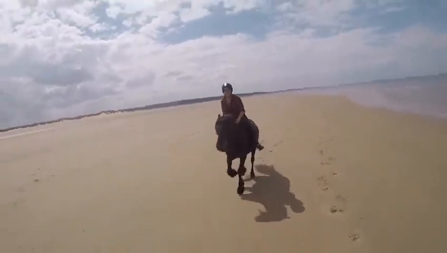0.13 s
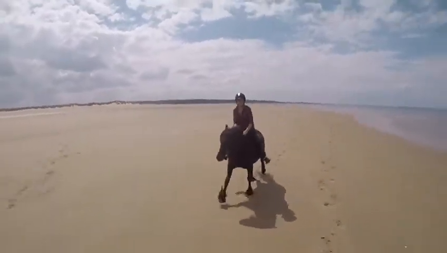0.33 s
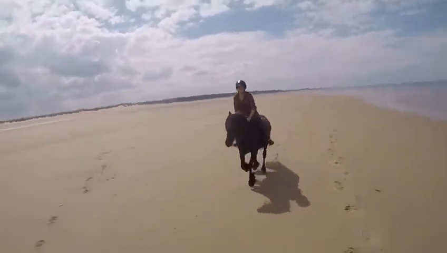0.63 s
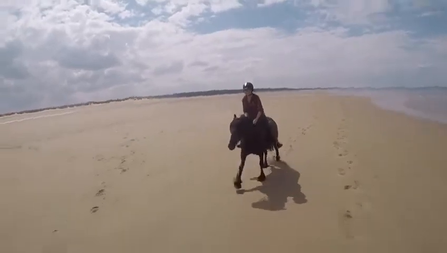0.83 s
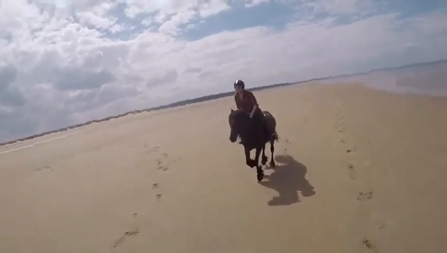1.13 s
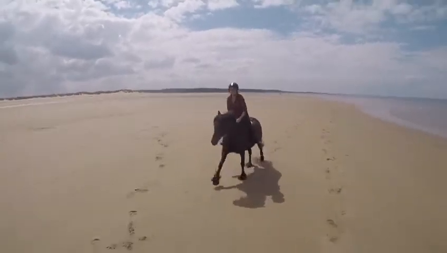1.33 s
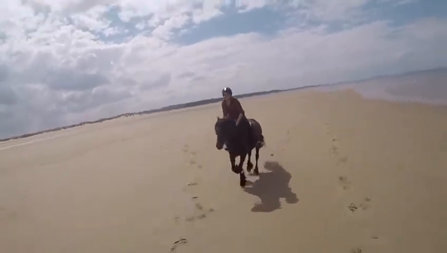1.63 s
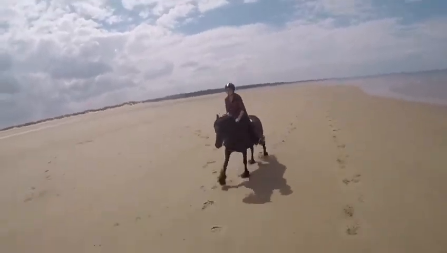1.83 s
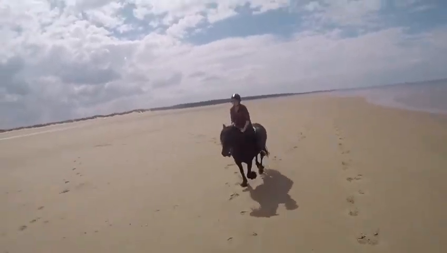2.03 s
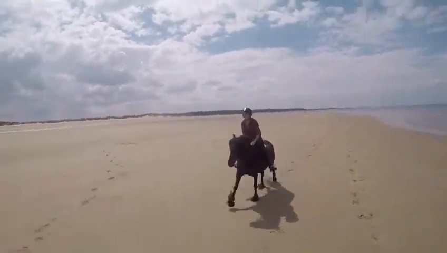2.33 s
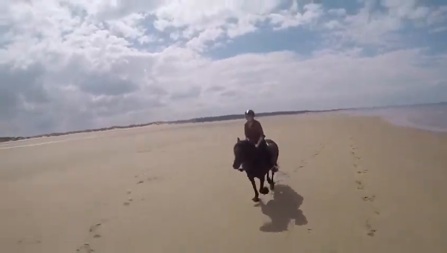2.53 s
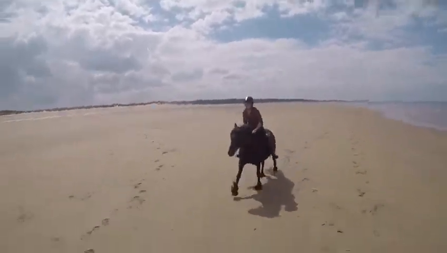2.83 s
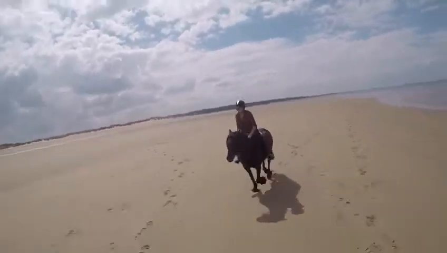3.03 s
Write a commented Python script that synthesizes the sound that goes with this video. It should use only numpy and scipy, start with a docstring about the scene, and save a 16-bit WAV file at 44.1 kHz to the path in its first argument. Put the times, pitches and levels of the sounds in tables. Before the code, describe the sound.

A horse's hooves canter on firm damp sand close to a moving microphone, dull hollow slaps in quick uneven clusters, about two strides a second, with constant low wind buffeting and faint sand grit, outdoors without echo.

```python
"""Open beach, firm damp sand: a horse canters close behind a moving microphone, about two strides a second.
From the first moment wind noise buffets the microphone, with rounded thumps, rough rushes and hiss over steady air;
sand swishes and crumbs patter, as shaped noise and small resonances; tack and some hoof contacts tick as short rings.
From 0.18 s to 3.0 s the hooves land, often heel then toe: a filtered click slaps, rebounds and rings hollow,
with decaying noise for grit and knock and a decaying sine for the thud; wind and a faint last tick close the scene."""
import sys
import numpy as np
from scipy import signal
from scipy.fft import rfft, irfft
from scipy.io import wavfile
from scipy.ndimage import uniform_filter1d

SR = 44100
rng = np.random.default_rng(int(sys.argv[2]) if len(sys.argv) > 2 else 0)


def file_out(sig):
    """Save sig as 16-bit WAV at sys.argv[1]."""
    # one column per channel
    cols = np.atleast_2d(sig).T
    # limit, then scale
    lim = np.clip(cols, -1, 1)
    pcm = np.round(lim * 32767).astype(np.int16)
    wavfile.write(sys.argv[1], SR, pcm)


N = 140238
T = np.arange(N) / SR

# Wind at the microphone. The level curves are before the trims below.
# low buffeting over time [t/s, level/dB]
BUFFET_LEVEL = [(0.0, -23.5), (0.21, -19), (0.26, -19), (0.33, -20), (0.5, -22), (0.56, -22.5),
                (0.61, -26.5), (0.79, -17), (0.82, -25.5), (1.0, -21), (1.15, -22.5), (1.2, -27),
                (1.24, -19.5), (1.39, -22), (1.44, -16.5), (1.52, -25.5), (1.65, -29), (1.73, -25),
                (1.78, -16.5), (1.87, -30), (1.95, -16), (1.99, -26.5), (2.05, -24), (2.13, -28.5),
                (2.23, -18.5), (2.31, -16), (2.43, -19), (2.46, -27), (2.52, -21), (2.63, -22.5),
                (2.70, -20), (2.76, -24), (2.79, -22), (2.83, -21.5), (2.88, -22), (3.18, -23.5)]
# rough rush of the gusts over time [t/s, level/dB]
RUSH_LEVEL = [(0.0, -29.5), (0.13, -29.5), (0.18, -28), (0.53, -28.5), (0.57, -22), (0.59, -33.5),
              (0.88, -27), (0.91, -39), (1.0, -21), (1.11, -31), (1.14, -23), (1.19, -37.5), (1.43, -26.5),
              (1.64, -39), (1.69, -28.5), (1.83, -33.5), (1.96, -25), (1.97, -39.5), (2.17, -42),
              (2.18, -28), (2.35, -28), (2.39, -23), (2.58, -27), (2.59, -22), (2.66, -47), (2.68, -29.5),
              (2.81, -43.5), (2.87, -31), (3.16, -41.5), (3.18, -30)]
# grainy hiss over time [t/s, level/dB]
HISS_LEVEL = [(0.0, -41), (0.12, -44), (0.36, -33.5), (0.53, -35.5), (0.71, -44), (1.18, -37.5),
              (1.41, -38.5), (1.63, -43), (1.89, -40), (2.02, -40.5), (2.24, -43), (2.4, -47),
              (2.53, -40.5), (2.67, -40), (3.18, -40)]
# grainy treble over time, followed by the crumbs too [t/s, level/dB]
TREBLE_LEVEL = [(0.0, -53), (0.14, -46), (0.27, -47.5), (0.36, -40), (0.58, -43.5), (0.68, -48),
                (1.36, -48), (1.59, -51.5), (1.86, -49.5), (2.03, -58), (2.26, -51.5), (2.42, -44.5),
                (2.47, -44.5), (2.62, -51), (2.85, -50), (2.98, -54), (3.18, -51)]
# spectrum of the buffeting [f/Hz, relative level/dB]
BUFFET_COLOUR = [(10, -3.5), (25, -1), (45, 2), (65, -0.5), (120, -4), (170, -12), (250, -20), (450, -37),
                 (1000, -75.5)]
# spectrum of the rush [f/Hz, relative level/dB]
RUSH_COLOUR = [(80, -28), (200, 0.5), (320, -1), (480, -4), (800, -9.5), (1300, -18), (2200, -26),
               (5000, -59.5)]
# spectrum of the hiss [f/Hz, relative level/dB]
HISS_COLOUR = [(300, -0.5), (800, 6.5), (1200, 5.5), (1700, 1.5), (2200, 5), (2700, -13.5), (3400, -5),
               (4200, -23.5), (7000, -41)]
# spectrum of the treble and of the snap of a tick [f/Hz, relative level/dB]
TREBLE_COLOUR = [(2000, -20), (3200, 2.5), (4000, 0.5), (5000, -6), (6500, -8), (7800, -39), (10000, -38)]
# spectrum of the steady sea air [f/Hz, relative level/dB]
AIR_COLOUR = [(500, -4.5), (3000, -28), (5000, -19.5), (7500, 4), (10000, -1)]
BUFFET_TRIM_DB, RUSH_TRIM_DB, HISS_TRIM_DB, TREBLE_TRIM_DB = 3, 0.5, -1.5, -1
AIR_DB = -61
# dB per unit of flutter; the hiss depth serves the treble too
BUFFET_FLUTTER_DB, RUSH_FLUTTER_DB, HISS_FLUTTER_DB = 0.5, 3.5, 3
FLUTTER_HZ = 49.6

# eddies that thump the microphone [t/s, level/dB before the trim, f/Hz]
EDDY_THUMPS = [(.05, -13, 104), (0.142, -9, 100), (.18, -12, 160), (0.234, -6.5, 100), (0.28, -5, 89),
               (.328, -8, 191), (.403, -5.5, 190), (.452, -7.5, 141), (0.527, -4, 136), (.556, -4, 172),
               (.572, -7, 113.6), (0.778, -10, 94), (1.018, -7.5, 161), (1.047, -15, 580),
               (1.06, -10.5, 147), (1.128, -7.5, 147), (1.292, -7.5, 139), (1.324, -8.5, 210),
               (1.453, -10, 168), (1.534, -10, 139), (1.711, -6.5, 125), (1.768, -9.5, 175),
               (1.838, -8.5, 109), (1.901, -8, 99), (1.93, -10.5, 151), (1.945, -13, 340),
               (2.284, -9, 74.3), (2.378, -9.5, 310), (2.421, -6, 130), (2.473, -10, 360),
               (2.484, -7.5, 97), (2.527, -5, 145), (2.589, -13, 231)]
THUMP_CREST_CYCLES, THUMP_TRIM_DB = 0.6, -2.5  # swings until the crest of the swell
THUMP_ROUNDNESS, THUMP_SKEW = 1.84, 0.24  # exponent of the swell; share of second harmonic

# Crumbs of damp sand raining down behind the hooves
CRUMBS_PER_S, CRUMB_CYCLES, CRUMB_SPREAD_DB = 450, 36, 3.5
CRUMB_LOW_HZ, CRUMB_HIGH_HZ = 2057, 5200
CRUMB_TILT_DB = -4  # per octave, on top of the 1/sqrt(f) weight
CRUMB_TRIM_DB = -2  # against the treble curve

# swishes of kicked sand [t/s at the middle, length/s, level/dB, centre f/Hz]
SAND_SWISHES = [(0.067, 0.029, -39.5, 4500), (0.337, 0.085, -44, 2900), (0.573, 0.027, -44.5, 4650),
                (0.707, 0.022, -40, 2480), (1.061, 0.049, -40.5, 4200), (1.143, 0.029, -39, 4100),
                (1.459, 0.041, -38, 4080), (1.808, 0.056, -50, 4700), (1.945, 0.032, -41.5, 3950),
                (2.265, 0.029, -35.5, 3940), (2.336, 0.012, -40.5, 4500), (2.562, 0.095, -43, 4300),
                (2.848, 0.029, -35, 1890), (2.979, 0.037, -41, 4600)]
# spectrum of fine grains pushed aside by the hoof [f/Hz, relative level/dB]
SPRAY_COLOUR = [(1000, -23), (3000, 5), (4500, 3), (6500, -4.5), (8000, -11), (10000, -17)]
SPRAY_DB = -34  # against the hoof level
SPRAY_LAG_S, SPRAY_DECAY_S = 0.001, 0.0068
SWISH_WIDTH = 1.24  # band edges over the centre
CLUMP_HZ, CLUMP_DB = 130, 4  # kicked sand flies in clumps; dB per unit of flutter
GRAIN_SPREAD_DB = 4.5

# short bright ticks: tack, and the sharp clicks of some hoof contacts [t/s, level/dB before the trim, f/Hz]
BRIGHT_TICKS = [(0.1258, -11, 3650), (0.4472, -13.5, 3000), (0.7494, -15.5, 3900), (0.754, -26.5, 4500),
                (0.95, -21, 5900), (1.136, -27, 4600), (1.773, -18.5, 3200), (2.0102, -19.5, 2740),
                (2.1777, -18.5, 2770), (2.1911, -21, 2880), (3.143, -27.5, 4300)]
TICK_CYCLES = 4.3  # sets the width of the resonances
RATTLE_T60_S, RATTLE_DB = 0.013, -15.5
TICK_TRIM_DB, SNAP_DB = -4, -20  # the snap is the broad first edge, against the ring

# hoof contacts [t/s, level/dB, sharpness f/Hz, hollow ring level/dB against the slap]
HOOF_CONTACTS = [(0.1796, -9, 2500, -5), (0.1941, -11, 2000, 2), (0.2569, -3.5, 3300, 4),
                 (0.3669, -10.5, 2380, 9), (0.5025, -10, 3300, 9.5), (0.6799, -8.5, 3000, -8),
                 (0.6942, -8.5, 2500, -12), (0.7698, -12, 3000, 7), (0.8696, -7.5, 2700, 1),
                 (0.8776, -11.5, 2000, 7), (0.9998, -8, 3500, -1), (1.024, -9, 2500, 4),
                 (1.1738, -11, 3000, -12), (1.2704, -5, 4200, 2), (1.3794, -8.5, 1500, 3),
                 (1.3818, -8, 2500, 1), (1.5049, -14, 3000, -8), (1.5793, -13.5, 1500, -4),
                 (1.68, -14, 2000, -11), (1.6913, -10.5, 1500, -5), (1.773, -13, 2420, -9),
                 (1.878, -10.5, 1400, -12), (1.8808, -6, 1600, 3), (1.9524, -13, 4000, -8),
                 (1.985, -17.5, 2000, -8), (2.004, -19, 1800, -5), (2.0107, -14, 1500, -4),
                 (2.081, -20, 2000, -4), (2.178, -15, 1500, 0), (2.1917, -11.5, 1400, -1),
                 (2.3802, -11, 1290, -2), (2.4159, -15, 2000, 3), (2.4189, -5.5, 1700, 3),
                 (2.424, -10.5, 1500, 4), (2.5098, -5.5, 6000, -18), (2.524, -9.5, 3000, -9),
                 (2.5894, -17, 1200, 5), (2.6831, -17, 5000, -1), (2.6858, -10.5, 1500, -1),
                 (2.8738, -11.5, 1400, 6), (2.8836, -8.5, 1900, 6), (2.9292, -17, 2000, -5),
                 (2.9435, -10, 2600, -8), (3.0027, -11.5, 2500, 1)]
# spectrum of the slap before each contact's own dulling [f/Hz, relative level/dB]
SLAP_COLOUR = [(100, -6), (300, 1.5), (650, 2), (900, 3.5), (1200, 4), (1600, 0.5), (2200, 1), (3200, 0.5),
               (4200, -4.5), (5000, -6), (7500, -18), (10000, -28)]
# dull knock of packed sand, its spectrum [f/Hz, relative level/dB]
KNOCK_COLOUR = [(100, 5), (250, -13), (450, 8.5), (700, -10.5), (1000, -11.5), (1400, -11), (3000, -41.5),
                (7000, -61)]
# the hoof and the air cupped under it [f/Hz before the spread, width/Hz, level/dB against the ring level]
HOLLOW_MODES = [(469, 67, 3), (870, 250, -3)]
HOLLOW_SPREAD_LOW, HOLLOW_SPREAD_HIGH = -0.1136, 0.071  # in ln f: no two steps ring quite alike
REBOUND_MIN_S, REBOUND_MAX_S = 0.0029 * 0.838, 0.0029 * 2.4  # back off the ground or the leg
REBOUND_DB = -11
GRIT_DB, GRIT_T60_S = -20, 0.012  # crunch under the hoof
SCATTER_DB, SCATTER_T60_S = -23, 0.051  # grains thrown clear
SINK_S = 0.00076  # crunch and knock build as the hoof sinks in
KNOCK_DB, KNOCK_T60_S = -19, 0.032
THUD_LOW_HZ, THUD_HIGH_HZ = 136.2, 136.2 * 1.48
THUD_DB, THUD_T60_S = -7.5, 0.06
THUD_LEAD_S = 0.0014  # the pressure dips just before the sole slaps down

CUTOFF_HZ = 10400


def from_db(db):
    """Decibels to gain."""
    return 10 ** (np.asarray(db) / 20)


def decay(start_db, t60_s, t):
    """Gain that starts at a level and falls 60 dB in t60_s."""
    return from_db(start_db - 60 * t / t60_s)


def rms_one(x):
    """Scale to unit power."""
    return x / np.sqrt(np.mean(x ** 2) + 1e-20)


def level(rows):
    """Gain over time from (t/s, level/dB) points."""
    return from_db(np.interp(T, *np.transpose(rows)))


def response(colour, size):
    """Gain per frequency bin from (f/Hz, level/dB) points, joined along log frequency."""
    hz, db = np.transpose(colour)
    bin_hz = np.arange(size // 2 + 1) * SR / size
    return from_db(np.interp(np.log(bin_hz + 1), np.log(hz), db))


def noise(colour, size=N):
    """Coloured noise of unit power."""
    spectrum = rfft(rng.standard_normal(size)) * response(colour, size)
    return rms_one(irfft(spectrum, size))


def pulse(colour, size):
    """Minimum-phase click of this colour, by folding its cepstrum to positive time."""
    cepstrum = irfft(np.log(response(colour, size)))
    cepstrum[1:size // 2] *= 2
    cepstrum[size // 2 + 1:] = 0
    return irfft(np.exp(rfft(cepstrum)))


def coloured(x, colour):
    """Pass an excitation through a causal filter of unit power."""
    click = pulse(colour, size=2048)
    return signal.fftconvolve(x, click / np.sqrt(np.sum(click ** 2)))[:len(x)]


def resonance(x, hz, width_hz):
    """One resonance, gain 1 at its top."""
    r = np.exp(-np.pi * width_hz / SR)
    zeros = np.array([1, 0, -1]) * (1 - r * r) / 2
    poles = [1, -2 * r * np.cos(2 * np.pi * hz / SR), r * r]
    return signal.lfilter(zeros, poles, x + 1e-18)


def evened(x, size):
    """Hold the short-term power of a noise steady."""
    power = uniform_filter1d(uniform_filter1d(x * x, size), size)
    return x / np.sqrt(power + 1e-9)


def flutter(hz):
    """Random wavering up to a rate, with rounded extremes."""
    lowpass = signal.butter(2, hz, fs=SR, output="sos")
    waver = rms_one(signal.sosfilt(lowpass, rng.standard_normal(N)))
    return 2 * np.tanh(waver / 2)


def grains(size):
    """Dense grains of uneven size, unit power."""
    grain_db = GRAIN_SPREAD_DB * np.minimum(rng.exponential(1, size), 5)
    return rms_one(rng.standard_normal(size) * from_db(grain_db))


def add(out, s, sound):
    """Mix a sound in at a time."""
    i = int(s * SR)
    out[i:i + len(sound)] += sound[:max(N - i, 0)]


def wind():
    """Turbulence as coloured noise in four ranges, fluttering with the same eddies, over steady sea air."""
    eddies = flutter(FLUTTER_HZ)
    grainy_flutter = from_db(HISS_FLUTTER_DB * eddies)
    buffet = evened(noise(BUFFET_COLOUR), size=1200) * from_db(BUFFET_FLUTTER_DB * eddies)
    rush = evened(noise(RUSH_COLOUR), size=900) * from_db(RUSH_FLUTTER_DB * eddies)
    hiss = coloured(grains(N), HISS_COLOUR) * grainy_flutter
    treble = coloured(grains(N), TREBLE_COLOUR) * grainy_flutter
    out = from_db(AIR_DB) * noise(AIR_COLOUR)
    out += from_db(BUFFET_TRIM_DB) * level(BUFFET_LEVEL) * rms_one(buffet)
    out += from_db(RUSH_TRIM_DB) * level(RUSH_LEVEL) * rms_one(rush)
    out += from_db(HISS_TRIM_DB) * level(HISS_LEVEL) * rms_one(hiss)
    out += from_db(TREBLE_TRIM_DB) * level(TREBLE_LEVEL) * rms_one(treble)
    return out


def thumps(size=4096):
    """Eddies at the microphone: a rounded, lopsided pressure bump that swells, swings and dies away."""
    out, t = np.zeros(N), np.arange(size) / SR
    for s, db, hz in EDDY_THUMPS:
        age = hz * t / THUMP_CREST_CYCLES
        swell = (age * np.exp(1 - age)) ** THUMP_ROUNDNESS
        phase = 2 * np.pi * (hz * t + rng.random())
        swing = np.cos(phase) + THUMP_SKEW * np.cos(2 * phase)
        add(out, s, from_db(db + THUMP_TRIM_DB) * swing * swell)
    return out


def crumbs(count=24):
    """Separate crumbs land at random, each ringing briefly at one of a set of pitches."""
    size_db = CRUMB_SPREAD_DB * np.minimum(rng.exponential(1, N), 3)
    sizes = rng.choice([-1, 1], N) * from_db(size_db)
    landed = sizes * (rng.random(N) < CRUMBS_PER_S / SR)
    pitch_index = rng.integers(0, count, N)
    out = np.zeros(N)
    for k, hz in enumerate(np.geomspace(CRUMB_LOW_HZ, CRUMB_HIGH_HZ, count)):
        ring = resonance(landed * (pitch_index == k), hz, 2 * hz / CRUMB_CYCLES)
        tilt = from_db(CRUMB_TILT_DB * np.log2(hz / CRUMB_LOW_HZ))
        out += ring / np.sqrt(hz) * tilt
    return from_db(CRUMB_TRIM_DB) * level(TREBLE_LEVEL) * rms_one(out)


def sand():
    """Kicked sand: band-passed grains that swell and fade, and a fine spray round every contact."""
    spray = np.zeros(N)
    for s, db, *_ in HOOF_CONTACTS:
        spray += from_db(db + SPRAY_DB) * np.exp(-abs(T - s - SPRAY_LAG_S) / SPRAY_DECAY_S)
    out = coloured(grains(N) * spray, SPRAY_COLOUR)
    flow = grains(N) * from_db(CLUMP_DB * flutter(CLUMP_HZ))
    for s, length, db, hz in SAND_SWISHES:
        edges = [hz / SWISH_WIDTH, hz * SWISH_WIDTH]
        band = signal.butter(2, edges, "band", fs=SR, output="sos")
        swell = np.exp(-(2 * (T - s) / length) ** 2)
        out += rms_one(signal.sosfilt(band, flow)) * from_db(db) * swell
    return out


def ticks(size=2048):
    """Small bright ticks: a click and a brief rattle excite a broad snap and a short ring."""
    out, t = np.zeros(N), np.arange(size) / SR
    for s, db, hz in BRIGHT_TICKS:
        rattle = rng.standard_normal(size) * decay(RATTLE_DB, RATTLE_T60_S, t)
        contact = (t == 0) + rattle
        width_hz = 2 * hz / TICK_CYCLES
        ring = resonance(resonance(contact, hz, width_hz), hz, width_hz)
        snap = coloured(contact, TREBLE_COLOUR)
        tick = ring / abs(ring).max() + from_db(SNAP_DB) * snap / abs(snap).max()
        add(out, s, from_db(db + TICK_TRIM_DB) * tick)
    return out


def hollow_ring(slap, ring_db):
    """The slap excites the resonances of the hoof and its cupped air."""
    ring = np.zeros(len(slap))
    for hz, width_hz, mode_db in HOLLOW_MODES:
        step_hz = hz * np.exp(rng.uniform(HOLLOW_SPREAD_LOW, HOLLOW_SPREAD_HIGH))
        ring += from_db(ring_db + mode_db) * resonance(slap, step_hz, width_hz)
    return ring


def hooves(size=8192):
    """Contacts: a slap of squeezed air, rebound, crunching grit, hollow ring, dull knock and ground thud."""
    out, t, click = np.zeros(N), np.arange(size) / SR, pulse(SLAP_COLOUR, size)
    sinking = 1 - np.exp(-t / SINK_S)
    crunch_decay = decay(GRIT_DB, GRIT_T60_S, t) + decay(SCATTER_DB, SCATTER_T60_S, t)
    knock_decay = decay(KNOCK_DB, KNOCK_T60_S, t)
    for s, db, sharp_hz, ring_db in HOOF_CONTACTS:
        # two equal one-pole low-passes dull the slap
        r = np.exp(-2 * np.pi * sharp_hz / SR)
        slap = signal.lfilter([(1 - r) ** 2], [1, -2 * r, r * r], click)
        crunch = grains(size) * sinking * crunch_decay
        grit = signal.fftconvolve(crunch, slap / np.sqrt(np.sum(slap ** 2)))[:size]
        slap = slap / slap.max()
        ring = hollow_ring(slap, ring_db)
        delay_s = rng.uniform(REBOUND_MIN_S, REBOUND_MAX_S)
        rebound = from_db(REBOUND_DB) * np.interp(t - delay_s, t, slap, left=0)
        knock = coloured(rng.standard_normal(size) * sinking * knock_decay, KNOCK_COLOUR)
        thud_hz = rng.uniform(THUD_LOW_HZ, THUD_HIGH_HZ)
        thud = -np.sin(2 * np.pi * thud_hz * t) * decay(THUD_DB, THUD_T60_S, t)
        add(out, s, from_db(db) * (slap + ring + rebound + grit + knock))
        add(out, s - THUD_LEAD_S, from_db(db) * thud)
    return out


def scene():
    """Wind, sand and horse on the open beach, with no echo."""
    return (wind() + thumps() + crumbs() + sand() + ticks() + hooves())[None]


def record(dry):
    """At the microphone the highest peaks are rounded towards full scale and the top is cut steeply."""
    rounded = dry / (1 + dry ** 6) ** (1 / 6)
    lowpass = signal.ellip(10, .3, 70, CUTOFF_HZ, fs=SR, output="sos")  # ripple/dB, stopband/dB
    return signal.sosfilt(lowpass, rounded)


dry = scene()
out = record(dry)
file_out(out)
```